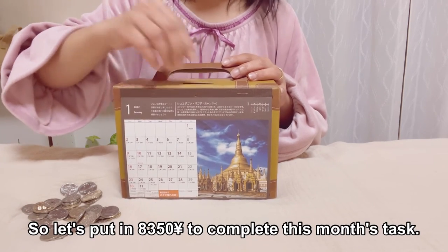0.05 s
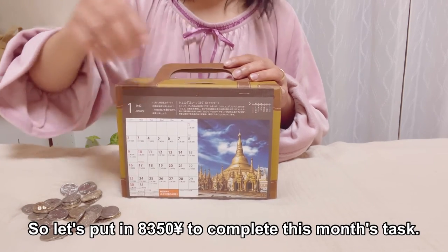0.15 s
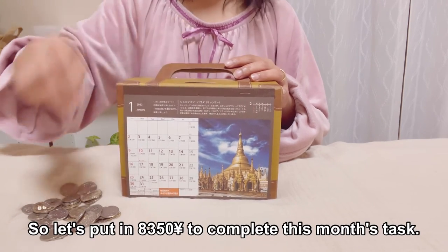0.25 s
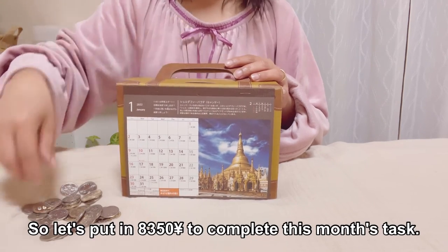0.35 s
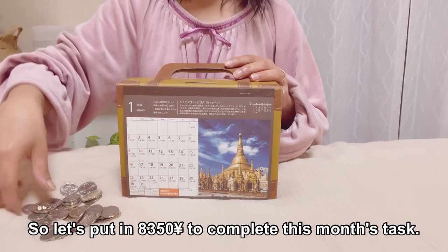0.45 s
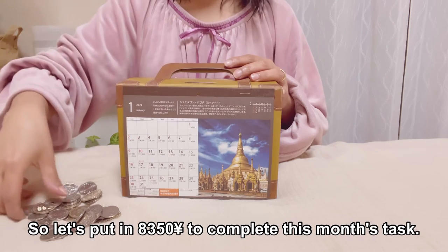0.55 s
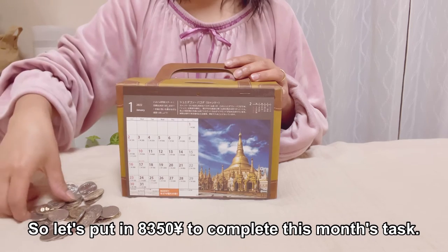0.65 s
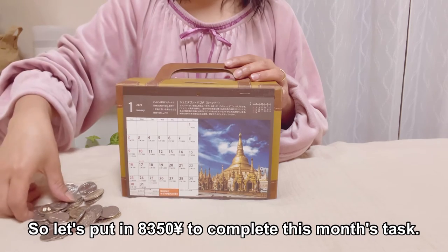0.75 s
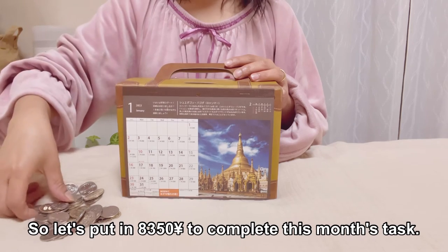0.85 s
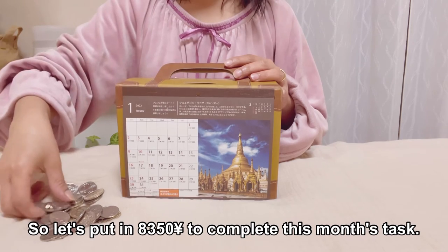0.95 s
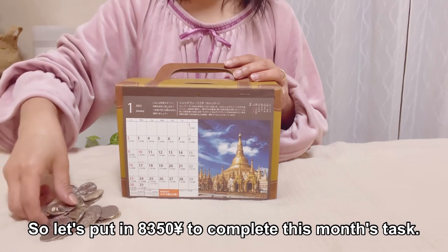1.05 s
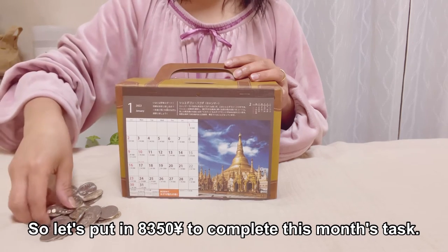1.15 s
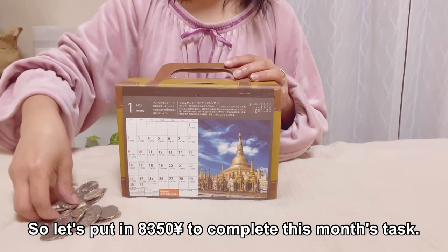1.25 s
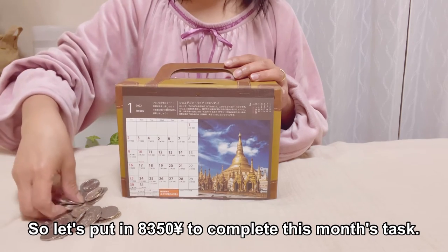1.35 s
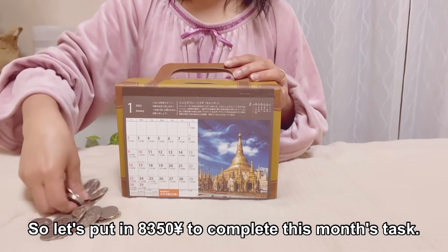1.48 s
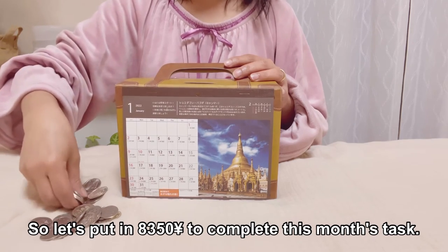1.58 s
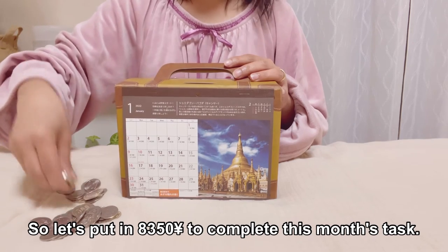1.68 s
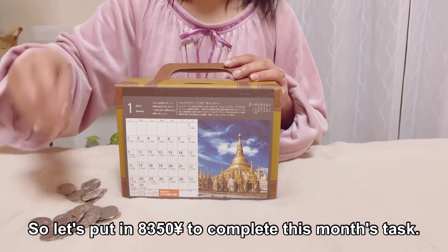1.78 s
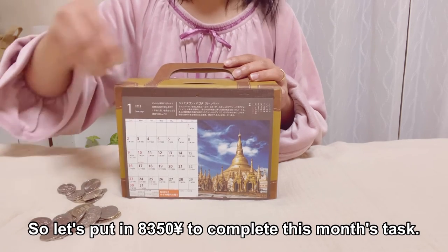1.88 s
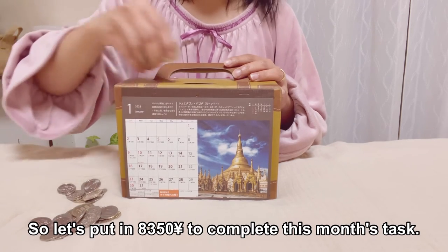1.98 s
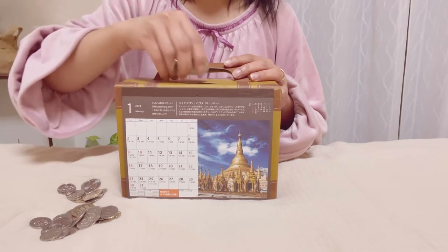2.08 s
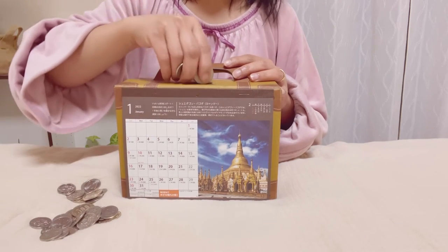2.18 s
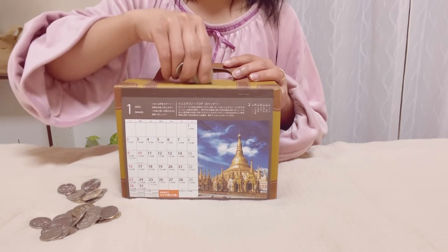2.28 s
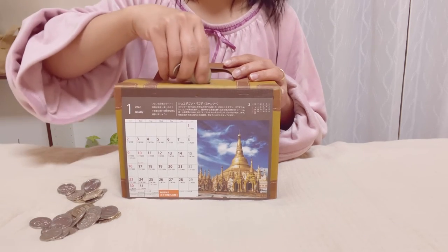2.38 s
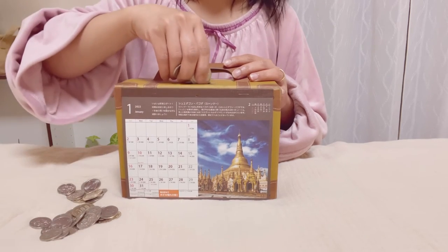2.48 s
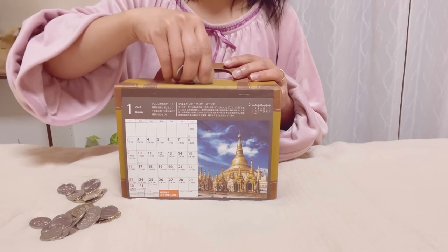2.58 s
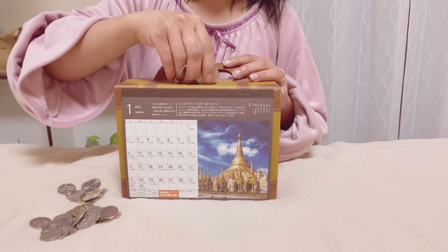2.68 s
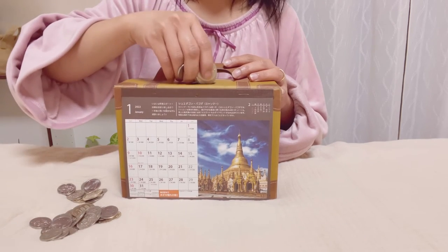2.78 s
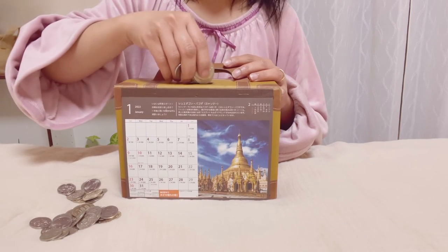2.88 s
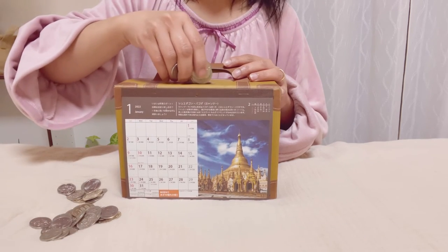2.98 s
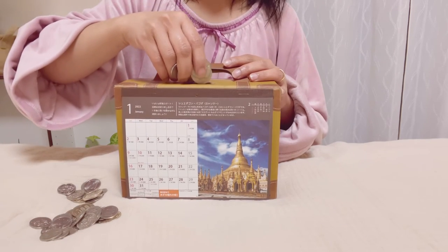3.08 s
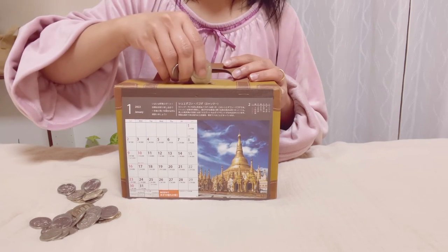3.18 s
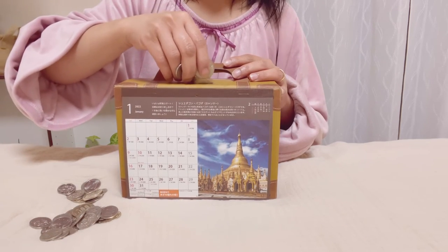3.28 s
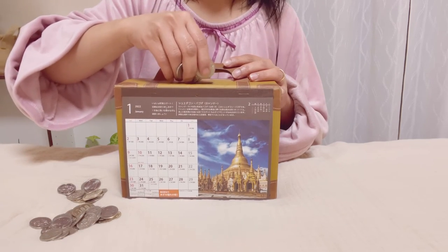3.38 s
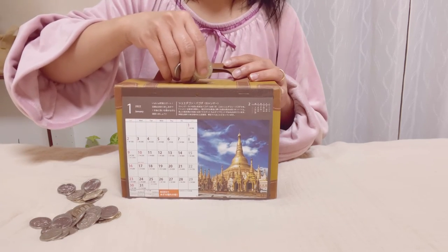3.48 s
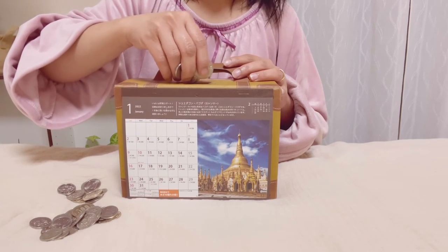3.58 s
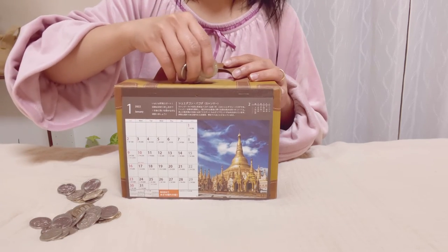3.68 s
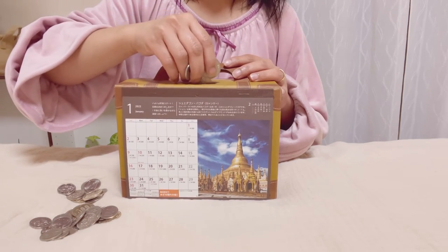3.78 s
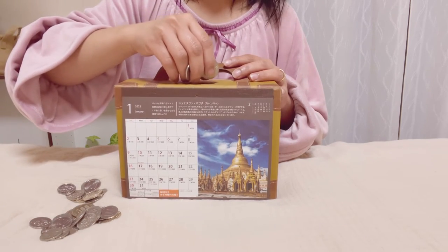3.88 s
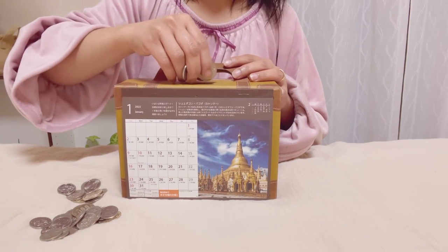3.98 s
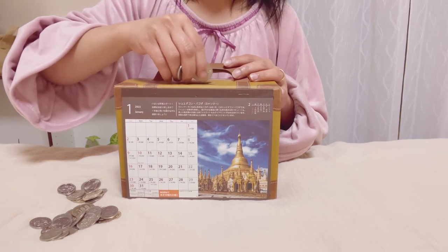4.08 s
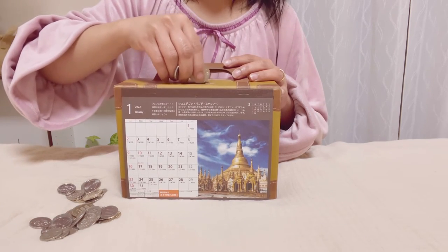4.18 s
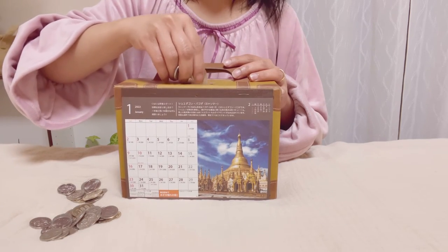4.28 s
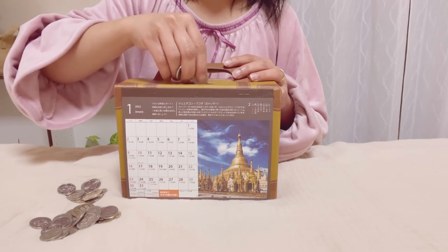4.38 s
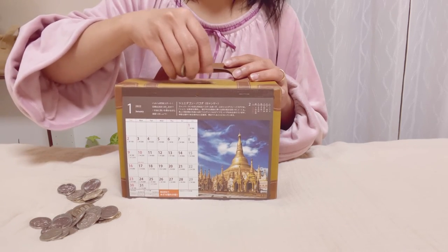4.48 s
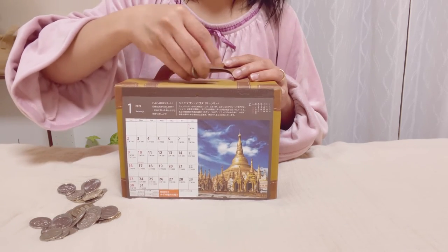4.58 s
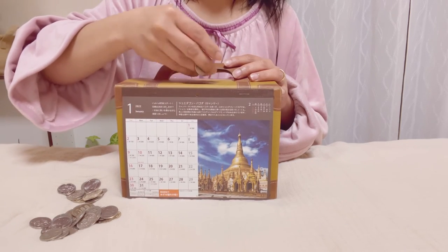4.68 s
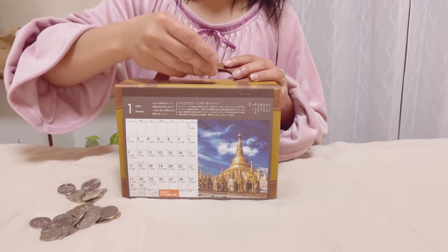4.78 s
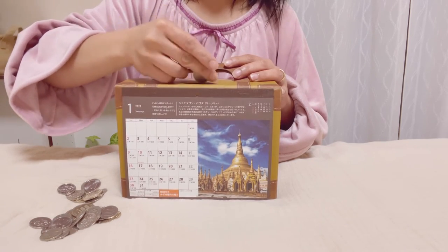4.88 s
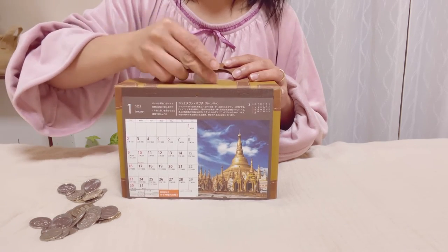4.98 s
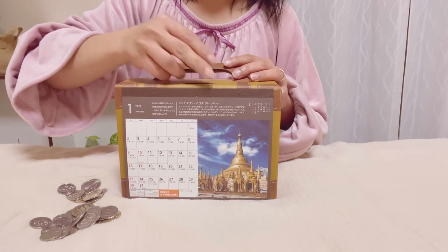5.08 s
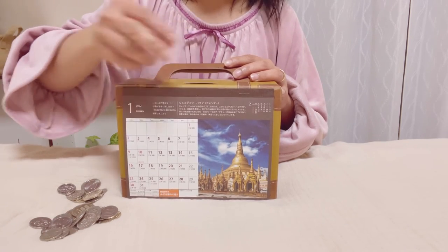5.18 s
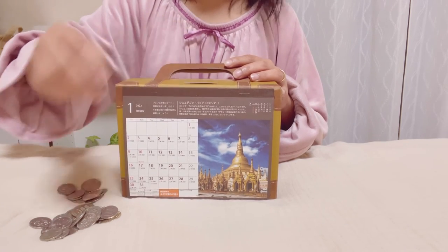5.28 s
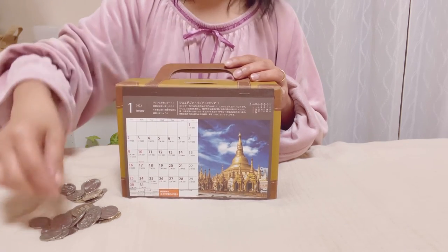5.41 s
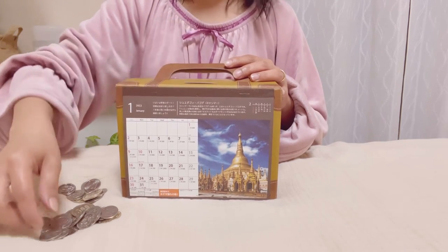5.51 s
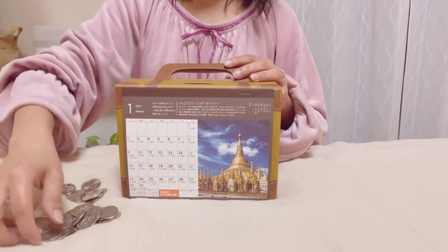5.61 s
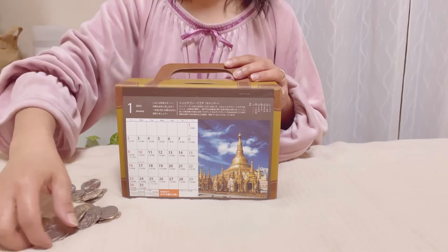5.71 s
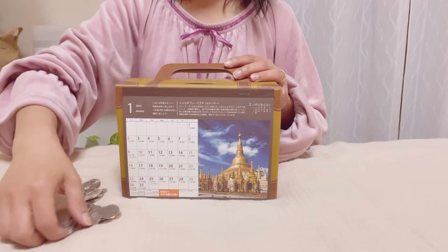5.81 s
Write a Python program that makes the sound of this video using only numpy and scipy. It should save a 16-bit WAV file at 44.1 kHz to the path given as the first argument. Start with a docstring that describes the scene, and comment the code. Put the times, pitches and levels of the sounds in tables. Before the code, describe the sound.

Close stereo pickup of coins being saved in a cardboard box. First a weak leftover bounce, then soft cloth rustle and dry metallic scraping and ticking as coins are gathered. After a near-quiet pause with small handling touches, several sharp drops land on card and other coins, some with a flat thump. A tight coin rasps through the slot and falls, then sleeve and coins rustle again. Small room, low rumble.

```python
"""Over a low room rumble a coin drops and rebounds in a cardboard bank; then a sleeve rustles on a tablecloth,
coins slide, tick and clink in a heap, the hand bumps the lid, and more coins fall, some with a flat thump.
One coin scrapes in the slot; a last reach to the heap follows. Impacts are damped modes plus noise bursts,
friction is noise gated by random slips, thumps are falling sines; a small room and two close microphones follow."""
import sys
import numpy as np
from scipy import signal
from scipy.fft import rfft, irfft, next_fast_len
from scipy.io import wavfile
from scipy.ndimage import map_coordinates

SR = 44100
rng = np.random.default_rng(int(sys.argv[2]) if len(sys.argv) > 2 else 0)


def persist_wave(psi):
    """Save psi, clipped to +-1, as 16-bit WAV."""
    counts = np.round(np.clip(psi, -1, 1) * 32767).astype(np.int16)
    wavfile.write(sys.argv[1], SR, np.atleast_2d(counts).T)


N = 257984
LEAD_S = .004  # silence ahead of each contact
T = np.maximum(np.arange(int(.4 * SR)) / SR - LEAD_S, 0)  # time since contact, s


def amp(db):
    """Decibels to gain."""
    return 10 ** (np.asarray(db) / 20)


def unit(x):
    """Scale to rms 1."""
    return x / np.sqrt(np.mean(x ** 2) + 1e-20)


def blow(x):
    """Scale to the energy of one millisecond at rms 1."""
    return x / np.sqrt(np.sum(x ** 2) * 1000 / SR + 1e-20)


def along(points, hz):
    """Interpolate (f/Hz, value) points on a log frequency axis."""
    f, v = np.transpose(points)
    return np.interp(np.log(hz + 1), np.log(f + 1), v)


def filtered(x, response):
    """Multiply the spectrum by a complex response of frequency."""
    n = x.shape[-1]
    m = next_fast_len(n + 4096)
    spectrum = rfft(x, m) * response(np.fft.rfftfreq(m, 1 / SR))
    return irfft(spectrum, m)[..., :n]


def coloured(x, spectrum):
    """Filter by (f/Hz, level/dB) points."""
    return filtered(x, lambda hz: amp(along(spectrum, hz)))


def fade(t60):
    """Exponential decay, 60 dB in t60 seconds."""
    return np.exp(-np.log(1000) * T / t60)


def burst(spectrum, t60):
    """Noisy crack of a contact: coloured noise with a fast rise and exponential decay."""
    rise = 1 - np.exp(-T / 0.0004)
    noise = rng.standard_normal(len(T)) * rise * fade(t60)
    return blow(coloured(noise, spectrum))


def ring(modes, detune):
    """Damped modes building up over a cycle; the point of contact shifts their strength and pitch."""
    hz, db, t60 = np.transpose(modes)
    shift, size, sign = rng.standard_normal((3, len(hz)))
    cycles = np.outer(hz * (1 + detune * shift), T)
    build_up = 1 - np.exp(-2 * cycles)
    waves = np.sin(2 * np.pi * cycles) * build_up * fade(t60[:, None])
    gains = np.sign(sign) * amp(db + 2 * size)
    return blow(gains @ waves)


def flutter(depth_db, rate):
    """Uneven gain of a ringing coin or panel as its neighbours brush it, rate changes a second."""
    wander = map_coordinates(rng.standard_normal(len(T)), [T * rate], order=1)
    return amp(depth_db * wander)


def rattle(x, db, t60):
    """A contact jostles the coins around it: small chance repeats that die away."""
    repeats = np.zeros(len(T))
    at = rng.integers(int(.004 * SR), int(.045 * SR), size=7)
    repeats[at] = rng.choice([-1, 1], size=7) * amp(db) * fade(t60)[at]
    return x + signal.fftconvolve(x, repeats)[:len(T)]


def room(x, wet_db, t60):
    """Decaying-noise echoes; rows: sound plus echoes shared by both microphones, unshared echoes."""
    rise = 1 - np.exp(-T / 0.00019)
    tails = rng.standard_normal((2, len(T))) * fade(t60) * rise
    tails = amp(wet_db) * tails / np.linalg.norm(tails[0])
    wet = signal.fftconvolve(x[None], tails, axes=1)[:, :len(x)]
    return np.array([x + wet[0], wet[1]])


def add(track, s, sound):
    """Mix in a sound with its contact, LEAD_S into it, at time s."""
    start = round((s - LEAD_S) * SR)
    sound = sound[:, max(-start, 0):]
    part = track[:, max(start, 0):][:, :sound.shape[1]]
    part += sound[:, :part.shape[1]]


def strokes(table):
    """Half-sine gains of hand strokes that swell and ease off."""
    t = np.arange(N) / SR
    return sum(amp(db) * np.sin(np.pi * np.clip((t - s) / length, 0, 1)) for s, length, db in table)


def friction(spectrum, rate, slip_t60):
    """Noise gated by random slips of uneven size, rate a second, each dying within milliseconds."""
    slips = (rng.random(N) < rate / SR) * amp(18 * rng.random(N))
    power = np.abs(signal.fftconvolve(slips ** 2, fade(slip_t60)[T > 0] ** 2)[:N])
    return unit(coloured(rng.standard_normal(N) * np.sqrt(power), spectrum))


# room rumble spectrum: f/Hz, relative level/dB
RUMBLE_SPECTRUM = [(25, -35), (53, -2.5), (87, -13.5), (123, -4), (330, -19.5), (430, -34), (1400, -45),
                   (5500, -55), (16000, -67.5)]


def background():
    """Low steady room rumble with a faint narrow whine, both filtered noise."""
    rumble = unit(coloured(rng.standard_normal((2, N)), RUMBLE_SPECTRUM))
    whine_band = lambda hz: 1 / (1 + ((hz - 1870) / 85) ** 2)
    whine = unit(filtered(rng.standard_normal((2, N)), whine_band))
    return amp(-54) * rumble + amp(-81.0) * whine


# coin modes: nominal f/Hz, relative level/dB, undamped t60/s
COIN_MODES = [(7650, -16.5, 0.17), (8130, -6.5, 0.2), (10800, 2, 0.029), (13500, 4.5, 0.23),
              (13080, 5.5, 0.029), (14980, 0.5, .06)]
# card crack spectrum: f/Hz, relative level/dB
CARD_CRACK = [(30, -28.5), (110, -2.5), (500, 10), (1500, 7), (2400, 2.5), (3300, -5), (5500, -19.5),
              (8000, -11), (16000, -56)]
# coin-on-stack tick spectrum: f/Hz, relative level/dB
STACK_TICK = [(1500, -6), (4000, -6), (7000, -9.5), (9500, -8), (11000, -4.5), (12400, -4.5),
              (14300, -12.5), (16000, -18.5)]


def contacts(table, modes, rattle_db):
    """Each contact sounds card and coins; soft ones favour the low modes, hard ones the high."""
    out = np.zeros((2, N))
    for s, knock_db, thud_db, steel_db in table:
        card = amp(-4.5) * ring(modes, detune=0.031) + amp(-6.5) * burst(CARD_CRACK, t60=0.032)
        card = coloured(card, [(330, thud_db + 16.0), (1400, knock_db)])  # thud below, knock above
        damping = fade(.25) * flutter(depth_db=4, rate=250)
        chime = amp(steel_db) * blow(ring(COIN_MODES, detune=.003) * damping)
        coin = amp(steel_db + 8.0) * burst(STACK_TICK, t60=0.059) + chime
        add(out, s, room(rattle(card, db=rattle_db, t60=0.058), wet_db=-3.0, t60=0.23))
        add(out, s, room(rattle(coin, db=rattle_db, t60=0.59), wet_db=-3.0, t60=0.24))
    return out


# coins landing and rebounding in the box: t/s, relative knock, thud, steel level/dB
COIN_LANDINGS = [(0.0, -20.5, -40.5, -40.5), (.039, -23, -40.5, -47), (.062, -31, -46, -63),
                 (0.078, -25, -64, -47), (3.169, -3.5, -23, -25), (3.191, -11.5, -29, -46.5),
                 (3.21, -14.5, -37.5, -45), (3.253, -16, -31.5, -32.5), (3.3986, -1, -21, -25),
                 (3.428, -25, -21.5, -47.5), (3.741, -17.5, -30.5, -38.5), (3.75, -10.5, -30, -36.5),
                 (3.943, -5, -18, -20.5), (3.953, -5, -25, -39), (3.963, -7, -23, -36.5),
                 (3.997, -8.5, -37.5, -30), (4.076, -17.5, -35.5, -38.5), (4.128, -32.5, -39, -56.5),
                 (4.3885, -0.5, -21, -25), (4.399, -20, -28, -32), (4.452, -14, -34.5, -32),
                 (4.519, -17, -32.5, -30.5), (4.538, -10, -39.5, -25), (4.553, -10.5, -23, -29.5),
                 (4.582, -19.5, -42, -33), (4.597, -15, -40.5, -40), (4.622, -21.5, -35.5, -36),
                 (4.698, -27.5, -46, -55), (5.153, -4, -20, -30), (5.174, -13, -27, -33),
                 (5.208, -20, -41.5, -33), (5.251, -13.5, -31, -34.5), (5.281, -24, -40.5, -45)]
# box modes, air and wide panels up to stiff corners: nominal f/Hz, relative level/dB, t60/s
BOX_MODES = [(103, -19.5, 0.13), (232.5, -12.5, 0.11), (394.3, 0, 0.029), (589, -5, 0.035),
             (740, -1.5, 0.014), (1070, -3.5, 0.015), (1448, 1, 0.021), (1576, 1, 0.012), (2220, -7, 0.027),
             (3910, -13.5, 0.025)]


def bank():
    """Each falling coin lands, rebounds and jostles the stack inside the box."""
    return contacts(COIN_LANDINGS, BOX_MODES, rattle_db=-11.5)


# coin or finger falling flat on card or table: t/s, level/dB
FLAT_FALLS = [(0.118, -23.5), (.218, -43.5), (1.053, -41.5), (1.638, -45), (3.001, -33.5), (3.848, -28.5),
              (4.045, -19.5), (4.405, -6.5), (4.504, -20), (4.552, -17), (4.65, -28), (4.663, -27),
              (5.1745, -8)]
# nominal pitch, scattered per thump; the fall is a time constant
THUMP_START_HZ, THUMP_END_HZ, THUMP_FALL_S, THUMP_T60_S = 1384, 416, .0025, 0.041


def thumps():
    """A flat blow bends the card; fast bending waves arrive before slow ones, so the pitch drops."""
    out = np.zeros((2, N))
    for s, db in FLAT_FALLS:
        hz = THUMP_END_HZ + (THUMP_START_HZ - THUMP_END_HZ) * np.exp(-T / THUMP_FALL_S)
        hz = hz * np.exp(0.12 * rng.standard_normal())
        wave = np.sin(2 * np.pi * np.cumsum(hz * (T > 0)) / SR)
        flex = blow(wave * fade(THUMP_T60_S) * flutter(depth_db=9, rate=700))
        add(out, s, room(amp(db) * flex, wet_db=-9, t60=0.1))
    return out


# sleeve on tablecloth as the hand reaches down: t/s, length/s, level/dB
SLEEVE_REACHES = [(.42, 0.56, -63.5), (5.6, 0.46, -57)]
# cloth rustle spectrum: f/Hz, relative level/dB
CLOTH_SPECTRUM = [(500, -1), (6000, -10), (16000, -13)]


def sleeve():
    """Soft fabric rustles ahead of each reach into the heap: coloured noise in swells."""
    rustle = strokes(SLEEVE_REACHES) * unit(coloured(rng.standard_normal(N), CLOTH_SPECTRUM))
    return np.array([rustle, np.zeros(N)])


# coin pushed over others, in heap or hand: t/s, length/s, relative level/dB
COIN_SLIDES = [(.54, 0.12, -43.5), (.905, 0.13, -37), (1.04, 0.16, -41), (1.15, 0.13, -37),
               (1.35, 0.12, -40.5), (1.59, 0.095, -48.5), (2.655, 0.22, -80), (2.975, 0.03, -38.5),
               (3.745, 0.067, -39.5), (5.735, 0.11, -30)]
# loose coin spectrum: f/Hz, relative level/dB
LOOSE_COINS = [(200, -8), (600, -5.5), (1500, -7.5), (3200, -11), (6500, -10), (8500, 2), (11000, 5),
               (12200, 5), (14000, -0.5), (16000, -1)]


def heap():
    """Milled rims scrape over one another as the fingers gather and feed coins."""
    scrapes = friction(LOOSE_COINS, rate=450, slip_t60=.01)
    return room(amp(-5) * strokes(COIN_SLIDES) * scrapes, wet_db=1, t60=0.32)


# coins pinched too tightly to ring: t/s, level/dB
DRY_TICKS = [(.712, -30), (0.986, -29), (0.9986, -27.5), (1.346, -31), (1.399, -26.5), (1.509, -34),
             (1.7585, -44), (2.233, -50), (2.2614, -37), (2.679, -40), (2.739, -46), (2.771, -40),
             (3.0477, -39.5), (5.7428, -29)]


def ticks():
    """A rim snaps off the edge of another coin; pinched tight, neither rings."""
    out = np.zeros((2, N))
    for s, db in DRY_TICKS:
        add(out, s, room(amp(db) * burst(LOOSE_COINS, t60=.02), wet_db=-5.5, t60=0.16))
    return out


# coin on coin, in heap or fingers: t/s, relative click level/dB, relative ring level/dB
COIN_CLINKS = [(1.0521, -12.5, -24.5), (1.061, -21.5, -28), (1.083, -20.5, -34), (2.272, -19.5, -40),
               (2.999, -21.5, -42.5), (3.032, -24.5, -33.5), (3.776, -24.5, -34.5), (3.811, -32.5, -32),
               (3.841, -19.5, -37)]


def clinks():
    """Two coins meet, each at its own pitch, their ring half damped by fingers or cloth."""
    out = np.zeros((2, N))
    for s, db, ring_db in COIN_CLINKS:
        click = amp(db - 7.0) * burst(LOOSE_COINS, t60=0.048)
        pair = sum(ring(COIN_MODES, detune=0.0075) for coin in range(2))
        damping = fade(0.06) * flutter(depth_db=7.5, rate=600)
        chime = amp(ring_db + 8.5) * blow(pair * damping)
        add(out, s, room(click + chime, wet_db=-5, t60=0.22))
    return out


# hand and its coins bumping the lid: t/s, relative knock, thud level/dB
LID_BUMPS = [(2.077, -39.5, -44), (2.144, -30.5, -41.5), (2.272, -27.5, -35.5), (3.003, -29, -38.5),
             (4.2515, -20.5, -25.5), (4.281, -29, -32.5), (4.351, -39.5, -49.5), (4.367, -28.5, -44),
             (4.843, -28, -60.5), (4.935, -34, -47), (4.976, -45, -47), (5.014, -37.5, -61)]
HELD_STEEL_DB = -27.5  # steel setting of a held coin, against its knock
# fingers and coin edges rubbing the lid: t/s, length/s, relative level/dB
LID_RUBS = [(2.53, 0.22, -48.5), (4.21, 0.045, -34.5), (4.335, 0.1, -54), (4.86, 0.17, -55.5)]
# top panel modes: nominal f/Hz, relative level/dB, t60/s
LID_MODES = [(210, 2.5, 0.057), (562, 0, 0.055), (660, -3, 0.047), (876, 0.5, 0.043), (1491, 7.5, 0.0065)]
# rubbed card spectrum: f/Hz, relative level/dB
CARD_SCUFF = [(100, -5.5), (550, 18), (950, 9.5), (1200, -7), (1550, 3), (2800, -10), (8000, -20.5),
              (16000, -12)]


def lid():
    """Fingers and coin edges bump and rub the card around the slot: panel modes and slip noise."""
    table = [(s, knock, thud, knock + HELD_STEEL_DB) for s, knock, thud in LID_BUMPS]
    bumps = contacts(table, LID_MODES, rattle_db=-24.0)
    rubs = amp(-7) * strokes(LID_RUBS) * friction(CARD_SCUFF, rate=440, slip_t60=0.017)
    return bumps + room(rubs, wet_db=-3.0, t60=0.07)


# coin rocking to rest in the box: t/s, length/s, f/Hz, level/dB
COIN_SETTLES = [(3.429, 0.067, 13200, -42.5), (4.61, .1, 7950, -39.5)]


def settling():
    """A coin rocks to rest free of the others, a single mode swelling and fading."""
    out = np.zeros((2, N))
    for s, length, hz, db in COIN_SETTLES:
        swell = np.sin(np.pi * np.minimum(T / length, 1)) * flutter(depth_db=-3.5, rate=180)
        tone = amp(db) * swell * np.sin(2 * np.pi * hz * T)
        add(out, s, room(tone, wet_db=-11, t60=0.1))
    return out


# coin sticking and worked through the slot: t/s, length/s, relative level/dB
STUCK_COIN = [(4.67, 0.31, -46.5)]
# slot scrape spectrum: f/Hz, relative level/dB
SLOT_SCRAPE = [(200, -10.5), (600, 5), (1100, -8.5), (1550, 1), (3000, -10.5), (8000, -20.5),
               (16000, -29.5)]


def slot():
    """The milled rim of a tight coin catches on the edge of the slot: sparse slip noise."""
    scrape = friction(SLOT_SCRAPE, rate=180, slip_t60=0.024)
    return room(amp(-9.5) * strokes(STUCK_COIN) * scrape, wet_db=6.0, t60=0.24)


# echoes unlike at the two microphones: f/Hz, relative level/dB
UNLIKE_ECHOES = [(200, -10), (1800, -8), (3200, 1), (6000, 1), (7500, -5), (9800, -9), (11000, -27),
                 (12600, -7), (14000, -15)]


def stereo(pair, direction):
    """Left and right from shared and unshared sound, with the phase lead of a direction."""
    unlike = coloured(pair[1], UNLIKE_ECHOES)
    lead = lambda hz: np.exp(.5j * np.outer([1, -1], along(direction, hz)))
    return filtered(np.array([pair[0] + unlike, pair[0] - unlike]), lead)


# hand position: t/s, 0 at heap to 1 over slot
HAND_PATH = [(1.8, 0), (2.05, 1), (5.2, 1), (5.5, 0)]
# colour of coins closed in the hand: f/Hz, level/dB
HAND_COLOUR = [(600, 10), (3000, 1.5), (9000, 4.5), (14000, -1.5)]
# lead of the left microphone, box direction: f/Hz, phase/rad
BOX_LEAD = [(100, 0), (1500, -.38), (4000, -1.6), (7000, 0)]
# lead of the left microphone, heap direction: f/Hz, phase/rad
HEAP_LEAD = [(300, 0), (2000, .6), (5200, 2.4), (7000, 0)]


def scene():
    """Box a little to the right, heap to the left; the hand carries coins from heap to box."""
    over_slot = np.interp(np.arange(N) / SR, *np.transpose(HAND_PATH))
    loose = heap() + ticks() + clinks()
    in_hand = coloured(over_slot * loose, HAND_COLOUR)
    at_box = bank() + thumps() + lid() + settling() + slot() + in_hand
    at_heap = background() + sleeve() + (1 - over_slot) * loose
    return stereo(at_box, BOX_LEAD) + stereo(at_heap, HEAP_LEAD)


# left lead in the treble, held near half a turn from 10.5 to 11.7 kHz: f/Hz, phase/rad
PORT_LEAD = [(7000, 0), (9000, 1.25), (10500, 3.0), (11700, 3.27), (12500, 4.0), (14000, 6.28)]
TOP_HZ = 15900  # band limit


def record(dry):
    """Microphone ports turn the treble phase apart; peaks are rounded; a steep low-pass ends the band."""
    ports = filtered(dry, lambda hz: np.exp(.5j * np.outer([1, -1], along(PORT_LEAD, hz))))
    rounded = ports / (1 + (ports / .85) ** 4) ** .25
    return filtered(rounded, lambda hz: 1 / np.sqrt(1 + (hz / TOP_HZ) ** 160))


dry = scene()
out = record(dry)
persist_wave(out)
```